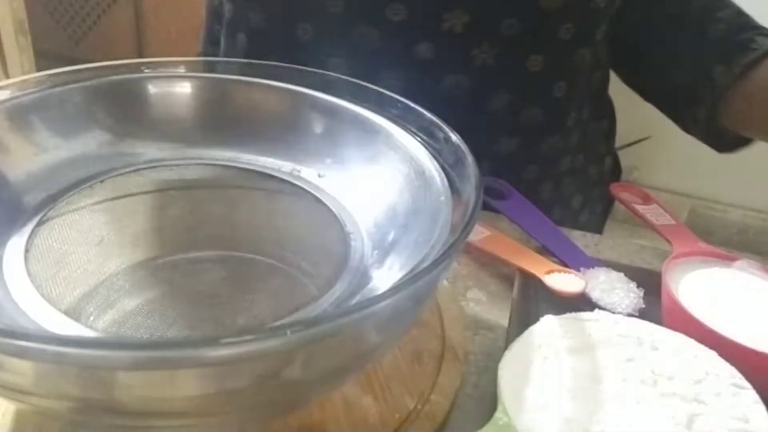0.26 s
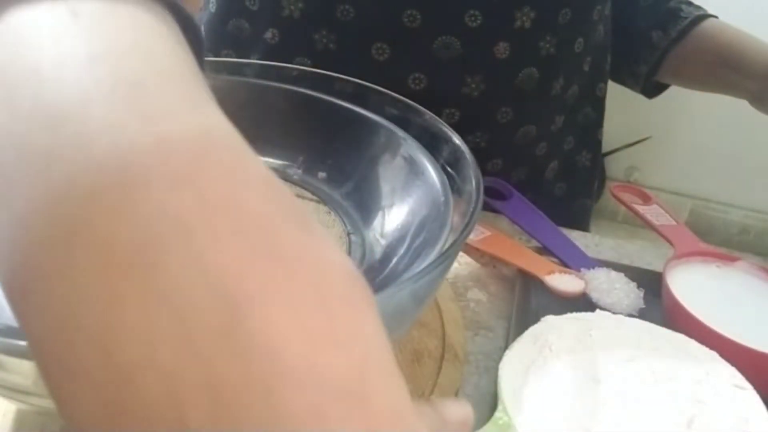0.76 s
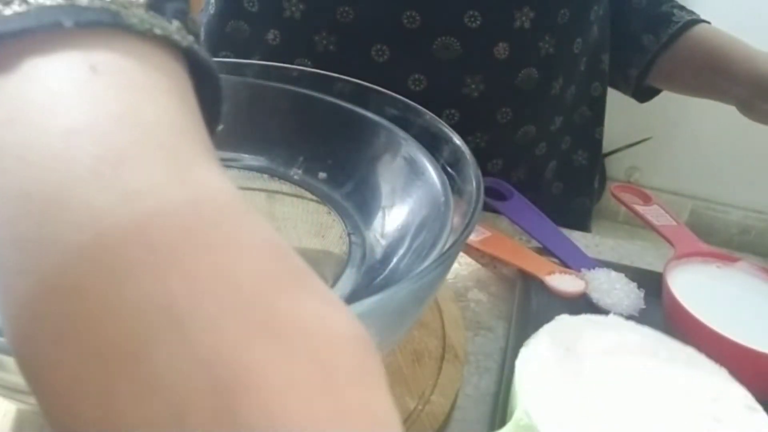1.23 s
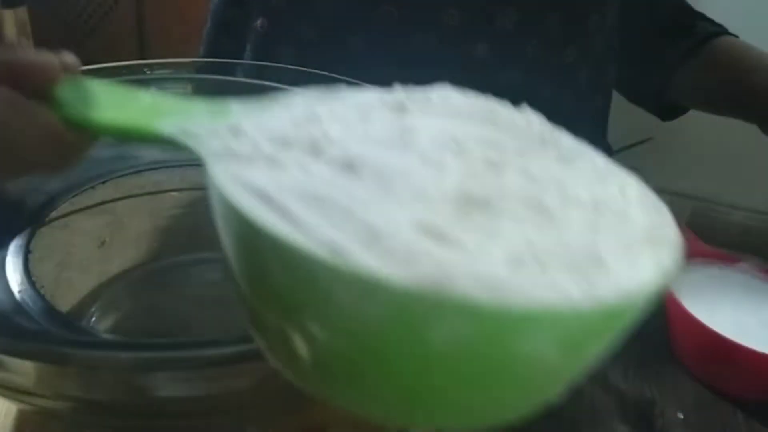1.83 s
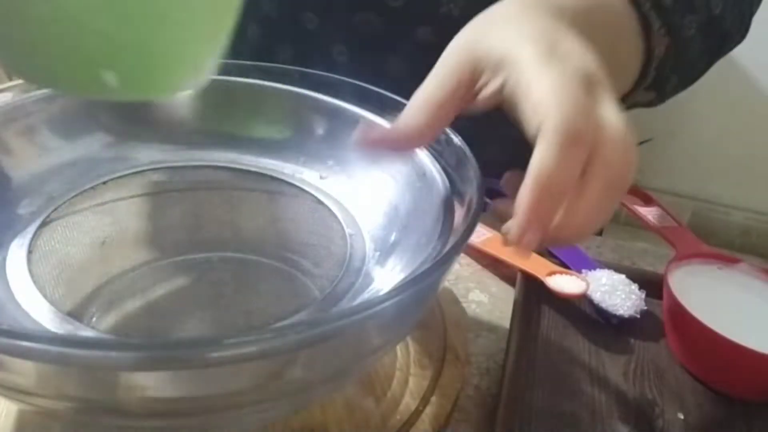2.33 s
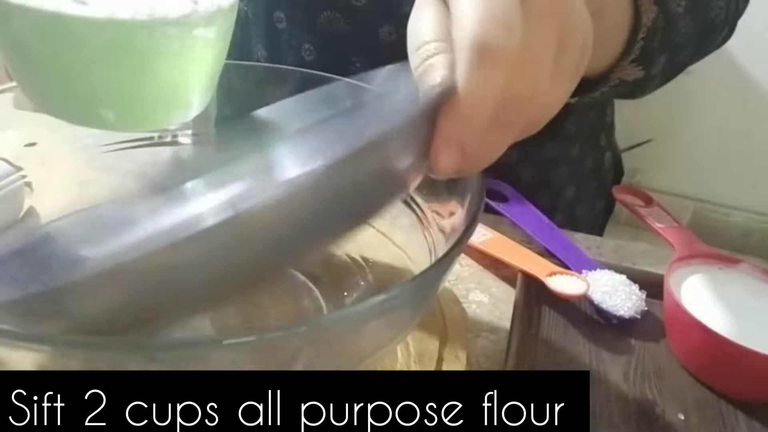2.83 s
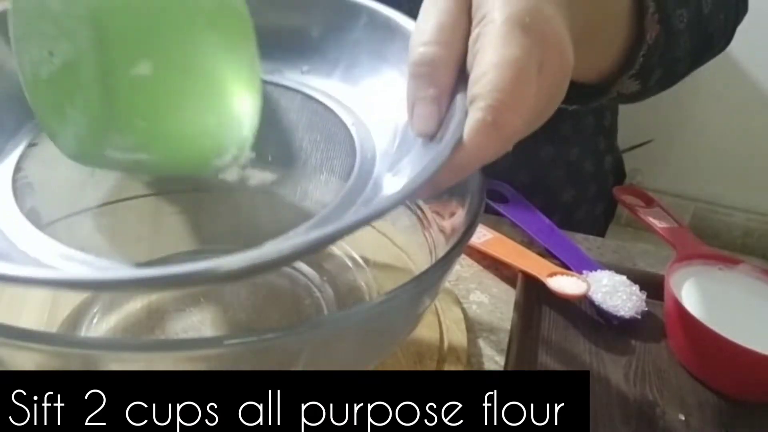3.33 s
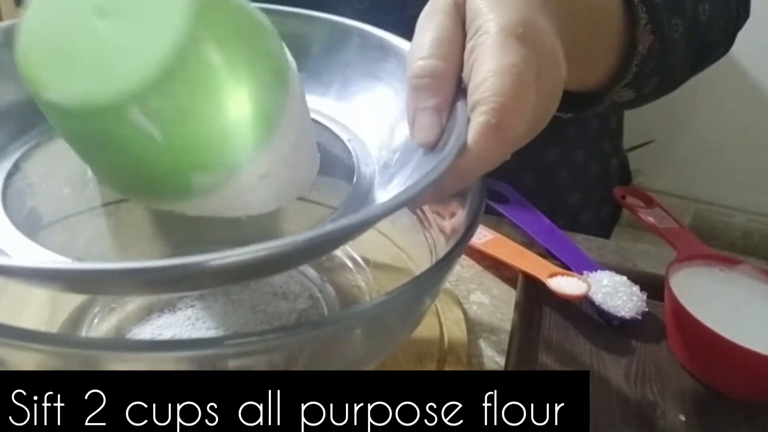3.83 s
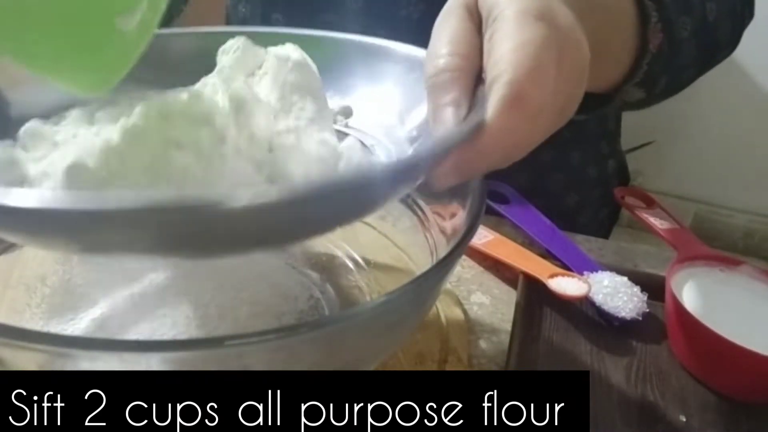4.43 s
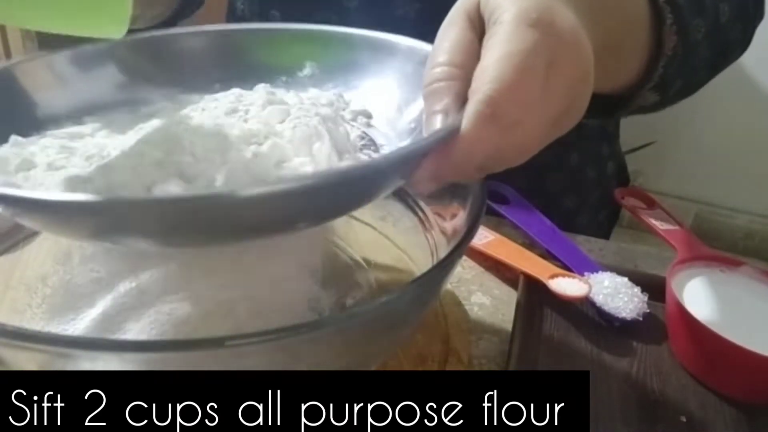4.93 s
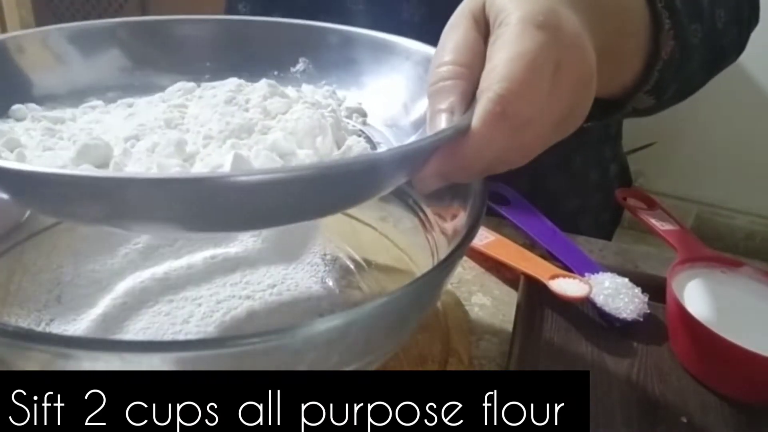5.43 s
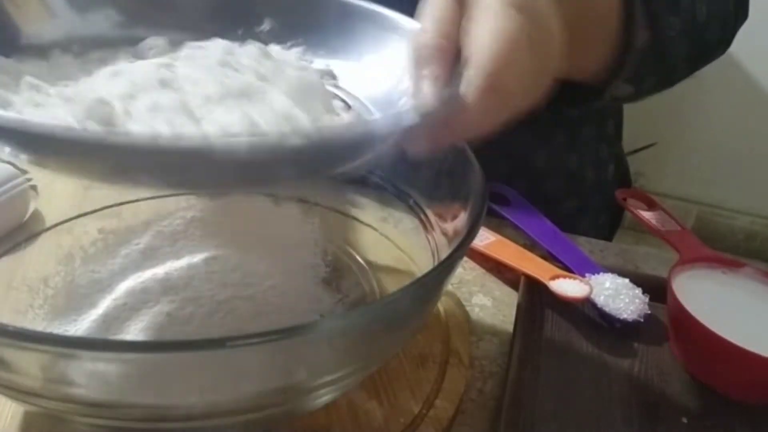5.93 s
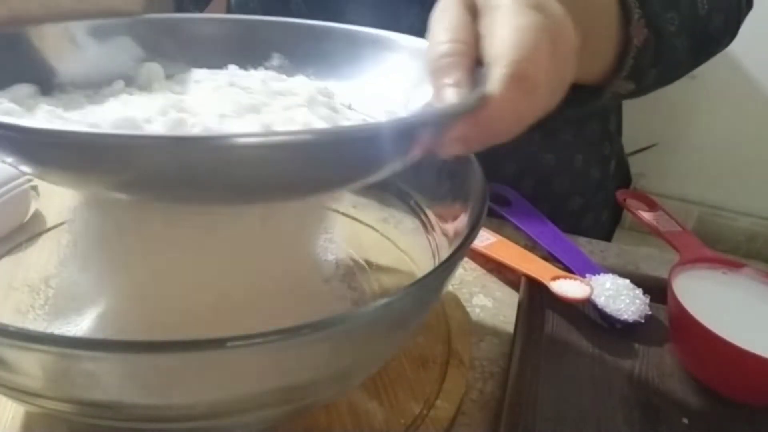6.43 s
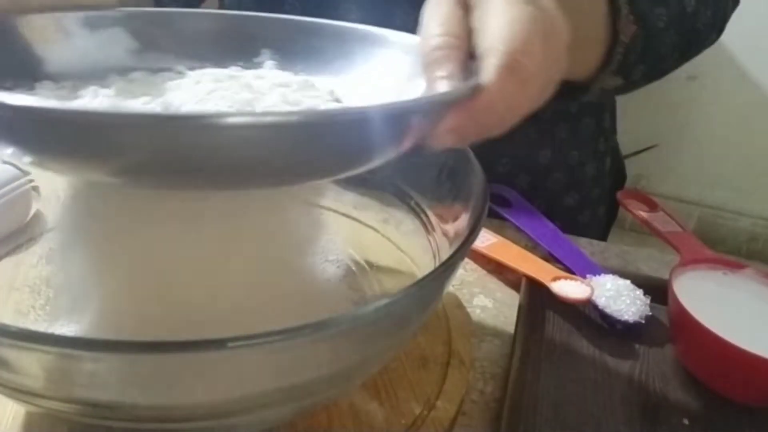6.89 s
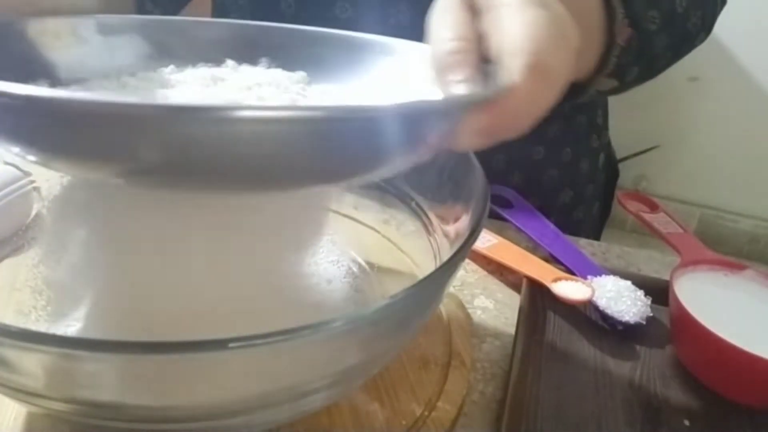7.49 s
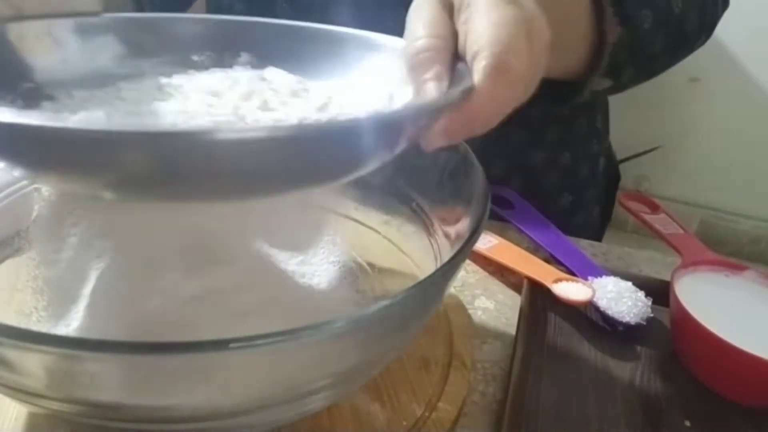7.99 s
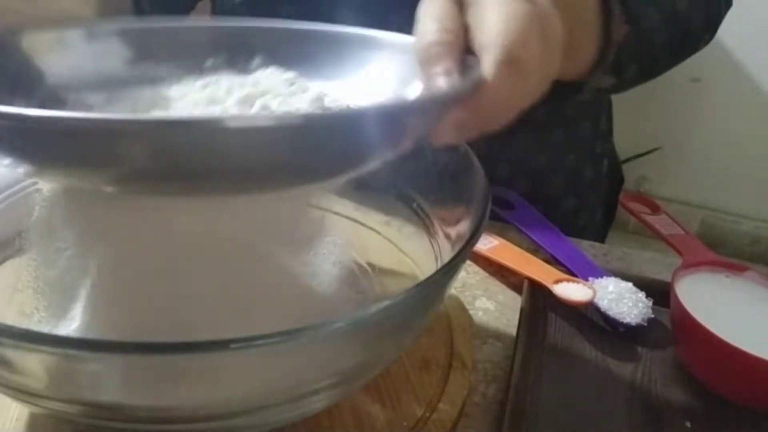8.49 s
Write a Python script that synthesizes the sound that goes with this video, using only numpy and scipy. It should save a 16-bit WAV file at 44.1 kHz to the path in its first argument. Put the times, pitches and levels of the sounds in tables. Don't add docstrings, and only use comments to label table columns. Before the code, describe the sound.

A quiet small kitchen heard closely in stereo, with short echoes, low rumble, soft air hiss and very faint high whistles. It fades in quickly from silence at 0.35 s. Around 1.0-1.3 s something slides faintly on the counter; at 1.74 s a hand brushes past with a dull bump. From 2.4 s a metal sieve ticks and scrapes along a glass rim, with a bright snap burst at 2.76 s. At 2.94 s it strikes the glass: a clear, wavering ring near 1 kHz, damped by 3.5 s, amid more scraping until 3.3 s. Flour lands in a soft, lumpy thud at 3.55 s. Very faint shakes and nudges follow, 3.8-4.9 s. Two loud, hard, woody cup knocks rattle the board at 5.39 and 5.59 s. From 5.9 s to the end at about 8.7 s, airy flour swishes repeat every 0.15 s, with light irregular metallic ticks, sharpest at 8.4 s.

```python
import sys
import numpy as np
from scipy import signal
from scipy.io import wavfile

SR = 44100
rng = np.random.default_rng(int(sys.argv[2]) if len(sys.argv) > 2 else 0)


def boost_factor(decibels):
    exponent = np.asarray(decibels, float) / 20
    return 10 ** exponent


def persist_wave(psi):
    counts = np.round(np.clip(psi, -1, 1) * 32767).astype(np.int16)
    wavfile.write(sys.argv[1], SR, np.atleast_2d(counts).T)


N = 385875
STEP = 32

# t/s, flour level/dB, fall/s
SHAKES = [(3.828, -75.5, 0.047), (3.915, -76, 0.015), (4.134, -71, 0.032), (4.244, -73.5, 0.017),
          (4.355, -79, 0.046), (4.447, -77.5, 0.021), (4.554, -72, 0.038), (4.66, -77, 0.018),
          (4.763, -77, 0.04), (4.88, -72, 0.027), (5.935, -62.5, 0.029), (6.07, -68.5, 0.059),
          (6.214, -66, 0.028), (6.364, -58.5, 0.036), (6.53, -59.5, 0.031), (6.673, -58, 0.032),
          (6.814, -58.5, 0.031), (6.96, -58.5, 0.055), (7.114, -57, 0.039), (7.256, -58.5, 0.037),
          (7.408, -57.5, 0.04), (7.56, -60, 0.025), (7.697, -59, 0.038), (7.838, -58.5, 0.027),
          (7.986, -60, 0.036), (8.128, -64.5, 0.035), (8.265, -61, 0.032), (8.413, -59.5, 0.057),
          (8.561, -59, 0.036), (8.707, -57, 0.036)]
# f/Hz, level/dB per Hz
FLOUR = [(290, -3), (500, -33.5), (586, -6.5), (794, -6.5), (1080, -1.5), (1540, -4), (2180, -5.5),
         (2450, 3), (3040, 1), (5920, 2), (7140, 4.5), (9950, -2.5), (15800, -0.5)]
SHAKE_RISE_S = 0.018
FIRST_DULL_DB, FULL_DULL_DB, DULL_LOSS_DB_PER_S, FULL_S = 0, 2, 0.89, 5.9

# t/s, peak level/dB
TICKS = [(1.2141, -47), (1.7377, -60), (2.4364, -39.5), (2.4578, -34.5), (2.5471, -59), (2.7636, -57),
         (3.1334, -45), (3.1857, -47), (3.2445, -39), (5.9115, -49.5), (6.5176, -56), (6.6692, -46.5),
         (6.8059, -41.5), (6.9516, -50), (7.0408, -44), (7.0978, -56), (7.4101, -45), (7.5477, -51),
         (7.6909, -52), (7.8276, -52), (7.9798, -43.5), (8.2641, -44), (8.4013, -33.5), (8.68, -64),
         (8.7006, -38.5)]
# f/Hz, level/dB, t60/s
FRAME = [(640, -10, .04), (1300, -10, .035), (2240, -7, .03), (2990, 0, .035), (3770, -8, .03),
         (6900, -10, .02)]
# f/Hz, level/dB, t60/s
CONTACT = [(1570, -5.5, 0.0097), (3340, -8, 0.067), (7000, -18, 0.005)]

# t/s, peak level/dB, rise/s, fall/s, brightness/dB
SCRAPES = [(2.21, -66.5, 0.13, 0.15, 8), (2.463, -39, 0.032, 0.05, -23), (2.551, -44, 0.13, 0.083, -6),
           (2.654, -45.5, 0.06, 0.21, 0), (2.615, -55, .08, .08, -8), (2.787, -39.5, 0.025, 0.071, -4),
           (2.96, -46, .01, 0.12, -11), (3.184, -52, 0.0086, 0.065, -2.5), (3.256, -47, 0.08, 0.27, -3.5),
           (3.29, -60.5, 0.014, 0.075, 3), (4.56, -62, 0.035, 0.24, -21), (4.762, -68, 0.029, 0.03, 7.5),
           (4.886, -84, 0.11, 0.046, 23)]
# f/Hz, width/Hz, level/dB
SIEVE = [(740, 9.8, -24.5), (1010, 28, -38), (1461, 35, -10.5), (2058, 21, -17.5), (2540, 11, -23),
         (3070, 110, -18), (3430, 143, -11.5), (4150, 61, -27), (3880, 30, -64), (5730, 300, -30),
         (6370, 14, -21), (7100, 250, -51), (8160, 81, -61)]
# f/Hz, level/dB per Hz
SCRAPE = [(180, -48.5), (300, -20), (676, -9.5), (1170, -3.5), (1470, -0.5), (1770, -23.5), (2020, 6),
          (3610, -12.5), (5380, -4), (7010, -13.5), (15800, -21.5)]
STROKE_DEPTH_DB, HOLD_END_S = 20, 3.28
# t/s, level/dB
SLIDE = [(0.92, -94.5), (0.996, -71.5), (1.066, -93), (1.098, -71), (1.202, -63.5), (1.216, -55.5),
         (1.226, -79), (1.266, -86), (1.33, -78)]
# f/Hz, width/Hz, level/dB
SLID_SPOON = [(1230, 120, -3), (1663, 100, 3.5), (2410, 280, -3), (3320, 260, -9), (4340, 260, -18)]

# t/s, peak level/dB
TINGS = [
    (2.6466, -45),
    (2.9435, -34),
]
# f/Hz, level/dB, t60/s
GLASS = [(1477, -6, 0.17), (1810, -12, 0.24), (2295, -6, 0.18), (1916, -10, 0.097), (3297, -5.5, 0.2),
         (5100, -6, .06), (3760, -2.5, 0.13), (4344, -13, 0.13), (6300, -8.5, 0.17), (5600, -10.5, 0.148),
         (7079, -20, 0.119)]
TING_S, BOWL_DB, BOWL_HZ = 2.9435, -28.5, 1051
BOWL_BEAT_HZ, BOWL_T60_S, BOWL_PARTNER = 3.7, 0.68, 0.66
BOWL_END_S, BOWL_END_T60_S = 3.46, 0.15
NUDGE_S, NUDGE_DB, NUDGE_T60_S = 3.235, -56, 1.25
# t/s, level/dB, t60/s
BRUSHES = [(2.654, -59, 1), (2.86, -60, 1), (4.065, -62, 0.13), (4.59, -64, .6), (4.612, -59, 0.8),
           (4.76, -60, 0.87), (4.85, -64, 1), (6.38, -64, .2), (6.599, -65, .2), (6.853, -65, 0.18),
           (7.155, -61.5, 0.32)]
# t/s, peak level/dB
SNAPS = [
    (2.746, -38),
    (2.7635, -24),
    (2.7662, -21),
    (2.7685, -28),
    (2.9441, -24),
    (2.9452, -29.5),
    (5.3865, -22),
    (7.041, -41),
]

# t/s, level/dB, f/Hz, t60/s
CLINKS = [(.385, -52, 640, 0.063), (.52, -67, 4030, 0.25), (0.829, -54.5, 3330, 0.079),
          (1.739, -38.5, 533, 0.015), (1.75, -60.5, 1070, 0.21), (2.39, -66, 1740, 0.12),
          (2.647, -43, 2077, 0.11), (2.648, -44.5, 2520, 0.12), (2.664, -36, 3740, 0.05),
          (2.458, -46, 3900, .04), (2.55, -48, 3500, .06), (2.9445, -40, 3250, .04),
          (2.68, -51.5, 930, 0.29), (2.69, -49, 3560, .12), (2.785, -39, 3510, 0.06),
          (2.945, -47, 400, 0.019), (2.656, -46, 2890, 0.076), (2.668, -49, 3080, 0.08),
          (2.652, -48, 4250, 0.064), (2.662, -42, 3230, 0.089), (2.648, -52.5, 1494, 0.27),
          (2.70, -50, 2850, 0.067), (2.78, -49, 3500, .06), (2.782, -48, 1460, .08),
          (2.79, -45.5, 2760, .06), (3.1, -51, 3500, 0.099), (2.505, -48, 1266, 0.096),
          (2.525, -55.5, 703, .1), (2.745, -44, 2850, 0.022), (2.765, -42.5, 10100, 0.014),
          (2.647, -53, 7150, 0.089), (2.668, -54, 7200, .1), (2.51, -59, 6400, .15),
          (2.49, -59, 7100, 0.088), (4.70, -69, 4850, .2), (4.6, -68, 3770, .15), (4.86, -70, 1820, .12),
          (4.565, -69, 1700, .15), (4.57, -68, 2400, .2), (5.05, -62, 900, .08), (5.395, -39, 920, .2),
          (6.4, -68, 1170, .08), (7.098, -57, 2200, .04), (7.26, -61, 620, .05), (6.7, -67, 900, 0.095),
           (7.84, -60, 2270, .05), (8.32, -73.5, 2250, 0.091), (4.476, -52, 574, 0.04),
           (4.775, -58, 540, 0.047), (4.815, -61.5, 3760, 0.086), (4.55, -72, 2288, .12),
           (4.6, -70, 2200, .2), (4.645, -70, 2350, .1), (4.6, -69, 1800, .15), (4.66, -68, 4700, .25),
           (4.05, -76, 4350, .15), (2.946, -46, 3300, .1), (2.947, -50.5, 2731, .2), (2.947, -52, 673, .12),
           (2.9437, -40, 4040, 0.027), (2.946, -50.5, 3400, .15), (3.183, -60, 2175, .08),
           (3.255, -56, 2500, 0.087), (3.305, -54.5, 694, 0.054), (4.92, -62, 771, 0.21),
           (5.025, -62.5, 780, 0.1), (5.392, -31.5, 2420, 0.033), (5.40, -41, 200, .2),
           (5.6, -38, 200, .15), (5.59, -37, 930, .08), (5.595, -42, 1100, .15), (5.6, -41, 1510, .04),
           (5.64, -54, 1760, .4), (5.388, -38, 1950, .04), (5.388, -38, 1480, .04), (5.6, -43, 1265, .2),
           (5.6, -40, 950, 0.17), (5.6, -50.5, 2277, 0.19), (5.29, -72, 2400, 0.32), (5.6, -54, 915, .8),
           (5.61, -56, 1690, 0.6), (5.62, -57, 1100, 0.55), (5.3865, -26, 530, .022),
           (5.386, -44, 7000, 0.0295), (5.085, -58, 175, 0.26), (5.815, -56.5, 3730, 0.03),
           (6.1, -69.5, 553, 0.41), (6.96, -62, 587, 0.058), (7.04, -57, 7000, 0.017),
           (8.14, -60.5, 400, 0.045)]
PARTNER_RATIO, PARTNER_SHARE = 1.014, 0.5

# t/s, level/dB, rattle/s, brightness/dB per octave, decay factor
BLOWS = [
    (1.736, -55.5, 0.012, -2.5, 0.5),
    (2.942, -47.5, 0.0024, 7.5, 0.45),
    (3.539, -52.5, 0.044, 6.5, 0.93),
    (4.472, -73.5, 0.043, -9, 0.77),
    (4.778, -78, 0.12, -3, 0.93),
    (5.02, -82.5, 0.03, 1, 0.46),
    (5.3845, -36.5, 0.04, 1.6, 1.15),
    (5.59, -33.5, 0.014, -0.23, 1.04),
    (8.138, -76.5, 0.031, -9, 0.5),
    (8.401, -72, 0.0038, 9.5, 0.21),
]
LANDING = 2
# f/Hz, level/dB per Hz
KNOCK = [(59, -87), (100, -110), (146, -2.5), (271, 2.5), (405, -9.5), (450, -3), (533, 5), (764, -4),
         (905, -1.5), (1330, -10.5), (1750, -9), (3900, -23), (7220, -31), (15800, -58)]
# f/Hz, t60/s
KNOCK_DECAY = [(120, 1), (320, 0.4), (840, 0.44), (2210, 0.33), (5820, 0.35)]
# f/Hz, level/dB, t60/s
COUNTER = [(153, -14.5, 0.67), (280, -18, 0.56), (338.4, -19, 0.36), (388.6, -16.5, 0.3), (500, -11, 0.2),
           (676, -11, 0.2), (832, -19, 0.22), (917, 0, 0.19), (1080, -17, 0.1), (1400, -28, 0.18),
           (1520, -9, 0.11), (1770, -17, 0.32), (1205, -21, 0.61), (1820, -37, 0.12)]
# f/Hz, level/dB, t60/s
CUP = [(400, -10, 0.1), (490, 0, 0.18), (610, 8, 0.21), (654, 1.5, 0.088), (329, -17, 0.12)]
BLOW_RISE_S, LANDING_RISE_S = 0.00053, 0.027
KNOCKS_S = (5.3, 5.9)

# t/s, level/dB, place of contact (0-1)
FIRST_KNOCK = [(5.385, -29, 0.22), (5.3872, -24, .11), (5.394, -40, 0.42), (5.400, -36, 0.08),
               (5.405, -37, 0.34), (5.411, -35, 0.04), (5.4165, -28, 0.18), (5.420, -30, 0.22),
               (5.428, -33, 0.05), (5.4345, -27, 0.18), (5.446, -33, 0.7), (5.463, -34, 0.06)]
# t/s, level/dB, place of contact (0-1)
SECOND_KNOCK = [(5.588, -36, 0.33), (5.593, -26, 0.065), (5.5965, -22, .13), (5.602, -31, 0.11),
                (5.609, -27.5, .15), (5.621, -30, 0.2), (5.632, -31.5, 0.21), (5.648, -37, 0.19),
                (5.668, -40, 0.23), (5.70, -45, 0.13)]
# t/s, level/dB, place of contact (0-1)
LUMPS = [(3.549, -38, 0.37), (3.557, -40, .1), (3.566, -44, 0.33), (3.577, -40, 0.24), (3.587, -39, 0.18),
         (3.598, -46, 0.44), (3.609, -40, 0.1), (3.617, -45, 0.2), (3.635, -47, 0.4), (3.657, -41.5, 0.32),
         (3.697, -47, 0.17), (3.74, -55, 0.15)]
# f/Hz, level/dB, t60/s
TILTED = [(156.6, -9.5, 0.38), (277.3, -4.5, 0.11), (335, -8, 0.11), (391, -6, 0.12), (536, 2, 0.053),
          (680.5, -5, 0.13), (834, -10, .12), (912, -3, .13), (1060, -19, .05), (1350, -25, .06),
          (1518, -18, 0.1), (1723, -16.5, 0.068), (1930, -19, .04), (2420, -16, 0.028)]
# f/Hz, level/dB, t60/s
FLAT = [(156, -14, 0.48), (276, -5.5, .16), (384, -4.5, 0.095), (532, -2.5, 0.075), (596, -4.5, 0.078),
        (673, -5.5, 0.078), (790, -10, .09), (900, -4.5, .12), (1070, -13, .09), (1183, -12, 0.16),
        (1495, -11, .05), (1700, -24, 0.2), (1910, -18, 0.1), (2200, -25, 0.089)]
# f/Hz, level/dB, t60/s
STRUCK_CUP = [(337, -2.5, 0.1), (400, -14, 0.069), (496, -1, 0.16), (630, -9, .06), (675, -3.5, 0.1),
              (940, -20, 0.074), (1217, -21, 0.054), (1473, -25, 0.052)]
CONTACT_S, SPREAD_DB = 0.00081, 4
THUD_ECHO = 0.4

# t/s, level/dB
ROOM_TONE = [(0.6, -57.5), (1.08, -58), (1.17, -55), (1.37, -64.5), (1.55, -71.5), (2.14, -70.5),
             (2.9, -69.5), (3.4, -70.5), (4.35, -72), (4.6, -70.5), (5.3, -69.5), (5.9, -69), (6.6, -69.5),
             (6.9, -66.5), (7.5, -69), (7.9, -67.5), (8.4, -70.5), (8.75, -66.5)]
# f/Hz, level/dB per Hz
RUMBLE = [(18, -57), (30, -62), (49, -49), (68, -39), (86, 8.5), (134, -19.5), (167, 23), (186, -4.5),
          (212, -13), (323, -10), (500, -21), (650, -55), (1100, -120)]
# f/Hz, level/dB per Hz
HISS = [(150, -20), (250, -3), (413, -11.5), (595, -5), (759, -9), (828, -4), (1130, -10.5), (2470, -13),
        (3370, -16), (4770, -15), (6990, -13.5), (9230, -23.5), (15800, -20.5)]
# f/Hz, width/Hz, level/dB
HUM = [(95, 6, -68), (176.4, 7.5, -57.5), (160.3, 9, -62.5)]
# f/Hz, width/Hz, level/dB
WHINES = [(7950, 64, -8), (15450, 500, -9)]
# f/Hz, likeness (-1 to 1)
LIKENESS = [(60, 0.85), (150, 0.93), (380, 0.49), (950, 0.16), (2380, -0.12), (5980, 0.059),
            (15000, -0.093)]
HISS_DB, HISS_FOLLOWS, CALM_DB = -74.5, 0.96, -69.5
HISS_BRIGHTENS = 0.33


def shake_power(hz):
    t, out = slow_time(), 0
    octaves = np.log2(max(hz, 1000) / 9000)
    for s, db, fall in SHAKES:
        dull_db = FIRST_DULL_DB if s < FULL_S else FULL_DULL_DB - DULL_LOSS_DB_PER_S * (s - FULL_S)
        x = np.where(t < s, (s - t) / SHAKE_RISE_S, (t - s) / fall)
        out = out + boost_factor(2 * (db - 3.0 - dull_db * octaves - 5.1 * x ** 1.65))
    return out * share(FLOUR, hz)


def flour_patter():
    drive = full_rate(np.sqrt(shake_power(2800))) * grit(400, 4.7)
    return boost_factor(-28.5) * ring(drive, FRAME, wander_db=5.0)


def ticks():
    clicks = clicks_at(TICKS)
    frame = ring(clicks, FRAME, wander_db=2.0)
    return boost_factor(-17.5) * frame + boost_factor(-15.0) * ring(clicks, CONTACT, pan_db=3.0)


def scrape_db():
    t = slow_time()
    s, db, rise, fall, bright_db = np.transpose(SCRAPES)[:, :, None]
    lifted = (s < HOLD_END_S) & (t > HOLD_END_S)
    distance = np.where(t < s, (s - t) / rise, (t - s) / fall)
    levels = db - STROKE_DEPTH_DB * distance - 100 * lifted
    return levels.max(axis=0), bright_db[levels.argmax(axis=0), 0]


def sieve_scrape():
    drive = full_rate(boost_factor(scrape_db()[0])) * grit(900, 5.1)
    return boost_factor(-49) * ring(drive, from_widths(SIEVE), wander_db=6.5)


def spoon_slide():
    drive = full_rate(boost_factor(in_time(SLIDE, -120)[0])) * grit(1200, 2.2)
    return boost_factor(-35.5) * ring(drive, from_widths(SLID_SPOON))


def glass():
    clicks = clicks_at(TINGS)
    return boost_factor(-8.5) * ring(clicks, GLASS) + boost_factor(-7) * ring(clicks, CONTACT, pan_db=0)


def bowl():
    now = np.arange(N) / SR
    t, late = np.maximum(now - TING_S, 0), np.maximum(now - NUDGE_S, 0)
    stilled_db = 60 * np.maximum(np.maximum(now, TING_S) - BOWL_END_S, 0) / BOWL_END_T60_S
    mode = np.sin(2 * np.pi * BOWL_HZ * t)
    pair = mode - BOWL_PARTNER * np.sin(2 * np.pi * (BOWL_HZ + BOWL_BEAT_HZ) * t)
    tone = boost_factor(BOWL_DB - 60 * t / BOWL_T60_S - stilled_db) * pair
    nudge = boost_factor(NUDGE_DB - 60 * late / NUDGE_T60_S - stilled_db) * np.minimum(late / 0.03, 1) * mode
    tone = tone + nudge
    return np.array([0.4 * np.roll(tone, 16), tone])


def snaps():
    return resonance(clicks_at(SNAPS) + 1e-18, 10100, 9700)


def clinks():
    out, t = np.zeros((2, N)), np.arange(int(0.4 * SR)) / SR
    events = [(*c, PARTNER_SHARE) for c in CLINKS]
    events += [(s, db, BOWL_HZ, t60, 0) for s, db, t60 in BRUSHES]
    for s, db, hz, t60, partner in events:
        at = round(s * SR)
        pair = np.sin(2 * np.pi * hz * t) + partner * np.sin(2 * np.pi * hz * PARTNER_RATIO * t)
        out[:, at:at + len(t)] += boost_factor(db - 60 * t / t60) * pair * np.minimum(t / 0.0015, 1)
    return out


def thuds(impacts, modes):
    out, t = np.zeros((2, N)), np.arange(int(0.5 * SR)) / SR
    hz, db, t60 = np.transpose(modes)[:, :, None]
    order = np.arange(1, len(modes) + 1)
    rings = boost_factor(db - 60 * t / t60) * np.sin(2 * np.pi * hz * t) * np.minimum(t / CONTACT_S, 1)
    sway = np.sin(order * 2.49) * np.sqrt(order / len(modes))
    lean = boost_factor(SPREAD_DB * np.outer([1, -1], sway))
    for s, level_db, place in impacts:
        at = round(s * SR)
        out[:, at:at + len(t)] += boost_factor(level_db) * (lean * np.sin(np.pi * order * place)) @ rings
    return out


def blow_envelopes(t60_s, tilt):
    t, out = slow_time(), 0
    for k, (s, db, rattle, bright_db, factor) in enumerate(BLOWS):
        rise = LANDING_RISE_S if k == LANDING else BLOW_RISE_S
        after = np.maximum(t - s - rise - rattle, 0)
        fall = 0.9 * boost_factor(-120 * after / 0.022) + 0.28 * boost_factor(-120 * after / (t60_s * factor))
        out = out + np.clip((t - s) / rise, 0, 1) ** 2 * fall * boost_factor(2 * (db + bright_db * tilt))
    return out


def knocks():
    blows, t = full_rate(np.sqrt(blow_envelopes(0.094, 0))), np.arange(N) / SR
    landing = np.abs(t - BLOWS[LANDING][0] - 0.1) < 0.2
    small = ~landing & ((t < KNOCKS_S[0]) | (t > KNOCKS_S[1]))
    counter = ring(blows * grit(1400, 5.2) * small, COUNTER, pan_db=1.5, wander_db=3.5)
    cup = ring(blows * grit(1400, 2.4) * landing, CUP, pan_db=1.5, wander_db=6.0)
    return boost_factor(-28) * (counter + cup)


def noises():
    out, white = 0, rng.standard_normal((2, 2, N))
    rumble_db, hiss_db = room_db()
    level_db, bright_db = scrape_db()
    together, rasp = drift(3.4), drift(63)
    for k in range(28):
        hz = 30 * 2 ** (k / 3)
        edges = [hz * 2 ** (-1 / 6), min(hz * 2 ** (1 / 6), 0.45 * SR)]
        band = signal.butter(2, edges, "band", fs=SR, output="sos")
        mid, side = signal.sosfilt(band, white[k % 2])
        alike = np.clip(at_hz(LIKENESS, hz), -0.9, 0.97)
        treble = np.clip(np.log2(hz / 3500), 0, 1)
        air_db = hiss_db + HISS_BRIGHTENS * treble * (rumble_db - CALM_DB - 7.5)
        rasp_db = level_db - 10.5 + treble * (bright_db + 7) + 2.5 * rasp
        power = share(RUMBLE, hz) * boost_factor(2 * (rumble_db - 6 + 3 * together))
        power = power + share(HISS, hz) * boost_factor(2 * air_db - 7)
        power = power + shake_power(hz) * boost_factor(3.2 * rasp)
        power = power + share(SCRAPE, hz) * boost_factor(2 * rasp_db)
        blows = blow_envelopes(at_hz(KNOCK_DECAY, hz), np.log2(max(hz, 250) / 600))
        power = power + share(KNOCK, hz) * blows
        keep = np.exp(-STEP / SR * hz / 1.5)
        power = signal.lfilter([1 - keep], [1, -keep], power)
        gain = full_rate(np.sqrt(power) * boost_factor(2.3 * drift(15))) / mid.std()
        out = out + gain * (np.sqrt(1 + alike) * mid + np.sqrt(1 - alike) * side * [[1], [-1]])
    return out


def kitchen(x, t60_s):
    t = np.arange(int(0.4 * SR)) / SR
    noise = rng.standard_normal((3, len(t)))
    bass = signal.sosfilt(signal.butter(2, 350, fs=SR, output="sos"), noise)
    tail = (noise[:2] - bass[:2] + bass[2]) * boost_factor(-60 * t / t60_s) * (t > 0.003)
    tail = tail / np.sqrt(np.sum(tail ** 2, axis=1, keepdims=True))
    return signal.fftconvolve(x, tail, axes=1)[:, :N]


def room_db():
    stir_db, = in_time(ROOM_TONE)
    return stir_db, HISS_DB + HISS_FOLLOWS * (stir_db - CALM_DB)


def hum():
    rumble_db, hiss_db = room_db()
    drive = full_rate(boost_factor(rumble_db + 64)) * rng.standard_normal(N)
    air = rng.standard_normal((2, N)) * full_rate(boost_factor(0.5 * (hiss_db - 67)))
    whistles = sum(boost_factor(db + 8.5) * resonance(air, hz, width) for hz, width, db in WHINES)
    return boost_factor(-43) * ring(drive, from_widths(HUM), pan_db=0, wander_db=2.5) + whistles


def slow_time():
    return np.arange(N // STEP + 1) * STEP / SR


def full_rate(control):
    return np.interp(np.arange(N) / STEP, np.arange(len(control)), control)


def in_time(rows, silent_db=None):
    s, *columns = np.transpose(rows)
    return [np.interp(slow_time(), s, c, silent_db, silent_db) for c in columns]


def at_hz(points, hz):
    f, value = np.transpose(points)
    return np.interp(np.log(hz), np.log(f), value)


def share(spectrum, hz):
    grid = 30 * 2 ** (np.arange(28) / 3)
    return hz * boost_factor(2 * at_hz(spectrum, hz)) / np.sum(grid * boost_factor(2 * at_hz(spectrum, grid)))


def drift(rate_hz):
    r = np.exp(-2 * np.pi * rate_hz * STEP / SR)
    slow = signal.lfilter([1], [1, -2 * r, r * r], rng.standard_normal(N // STEP + 2001))[2000:]
    return slow / slow.std()


def grit(per_s, spread_db):
    hits = rng.random(N) < per_s / SR
    x = hits * boost_factor(spread_db * np.minimum(rng.exponential(1, N), 4)) * rng.choice([-1, 1], N)
    return x / x.std()


def clicks_at(events):
    out = np.zeros(N)
    out[[round(e[0] * SR) for e in events]] = boost_factor([e[1] for e in events])
    return out


def ring(clicks, modes, pan_db=8.0, wander_db=0.0):
    out = np.zeros((2, N))
    for (hz, db, t60), pan in zip(modes, rng.normal(0, 1, 30)):
        r, w = boost_factor(-60 / (t60 * SR)), 2 * np.pi * hz / SR
        drive = clicks * full_rate(boost_factor(wander_db * drift(7.3))) if wander_db else clicks
        tone = signal.lfilter([0, np.sin(w)], [1, -2 * r * np.cos(w), r * r], drive + 1e-18)
        out += tone * boost_factor(db + pan_db * pan * np.array([[1], [-1]]))
    return out


def from_widths(peaks):
    return [(hz, db + 10 * np.log10(w), np.log(1000) / np.pi / w) for hz, w, db in peaks]


def resonance(x, hz, width_hz):
    r, w = np.exp(-np.pi * width_hz / SR), 2 * np.pi * hz / SR
    return signal.lfilter([(1 - r * r) / 2, 0, (r * r - 1) / 2], [1, -2 * r * np.cos(w), r * r], x)


def at_capsules(x):
    x = signal.sosfilt(signal.butter(4, 140, "high", fs=SR, output="sos"), x)
    return np.array([np.roll(x[0], 19), x[1]])


def scene():
    rubs = flour_patter() + sieve_scrape() + spoon_slide()
    near = at_capsules(rubs + ticks() + glass() + snaps() + clinks() + knocks())
    hits = at_capsules(thuds(FIRST_KNOCK, TILTED) + thuds(SECOND_KNOCK, FLAT) + thuds(LUMPS, STRUCK_CUP))
    echoes = boost_factor(-5.5) * kitchen(near + THUD_ECHO * hits, t60_s=0.26)
    return near + hits + echoes + bowl() + noises() + hum()


def band_limit(x):
    return signal.sosfilt(signal.butter(12, 16650, fs=SR, output="sos"), x)


def record(dry):
    dry = signal.sosfilt(signal.butter(2, 55, "high", fs=SR, output="sos"), dry)
    dipped = dry - 0.6 * resonance(dry, 5800, 800) - 0.35 * resonance(dry, 5000, 600)
    coloured = dipped + 0.78 * resonance(dipped, 7160, 560) + 0.064 * resonance(dipped, 9400, 1400)
    topped = signal.sosfilt(signal.ellip(8, 0.5, 34, 15780, fs=SR, output="sos"), coloured)
    start_s, fade_s = 0.35, 0.08
    fade = np.clip((np.arange(N) / SR - start_s) / fade_s, 0, 1) ** 0.79
    return band_limit(topped * fade)


dry = scene()
out = record(dry)
persist_wave(out)
```